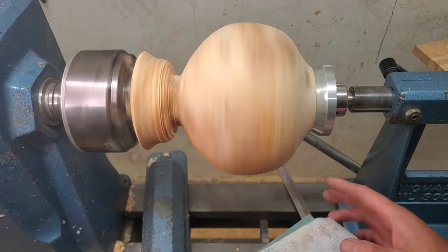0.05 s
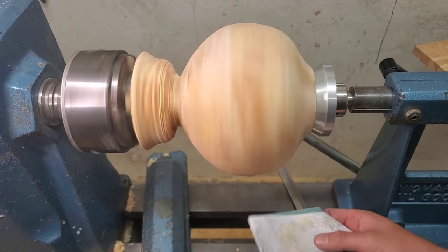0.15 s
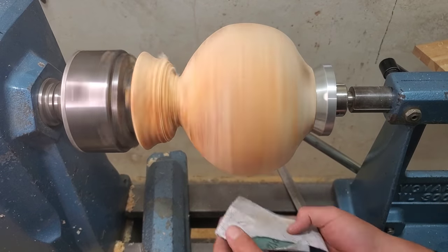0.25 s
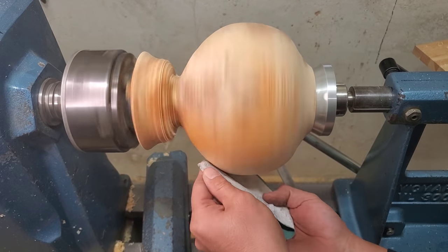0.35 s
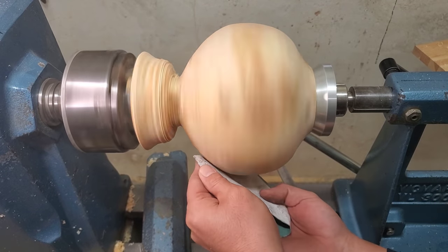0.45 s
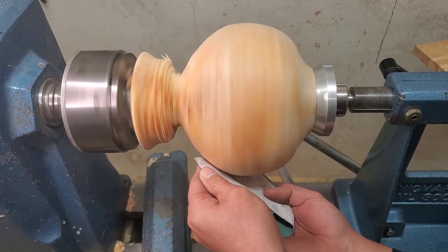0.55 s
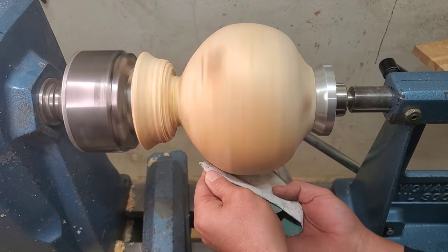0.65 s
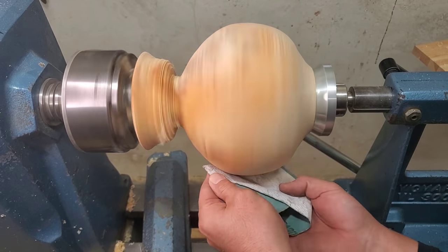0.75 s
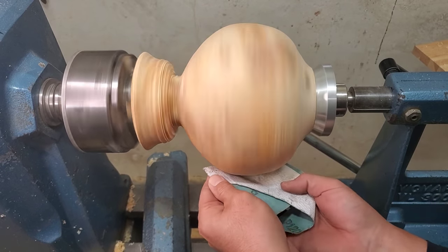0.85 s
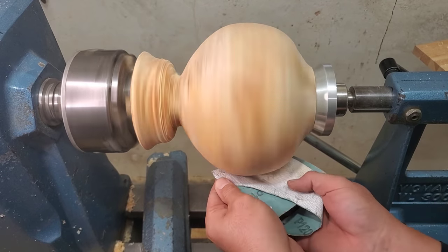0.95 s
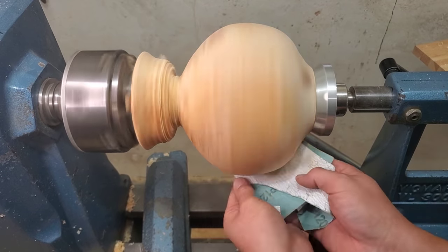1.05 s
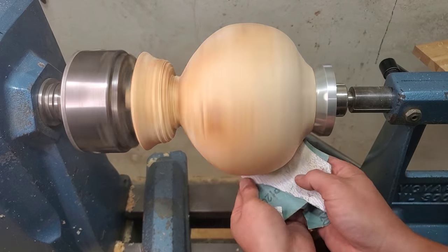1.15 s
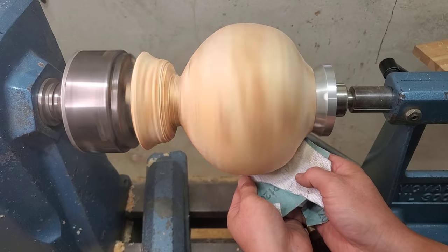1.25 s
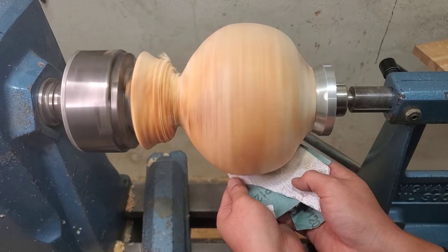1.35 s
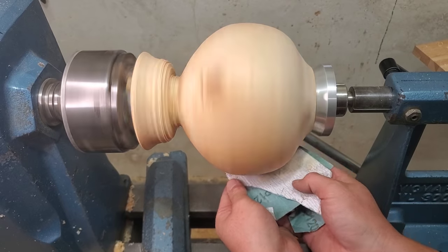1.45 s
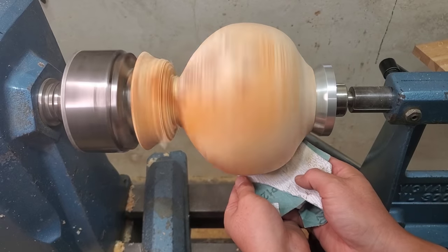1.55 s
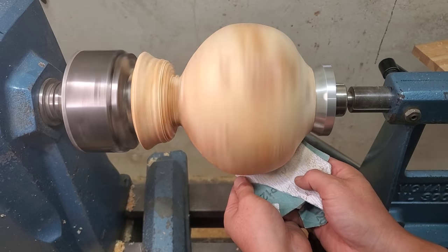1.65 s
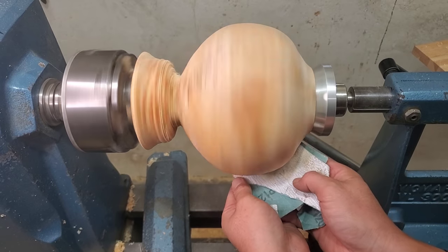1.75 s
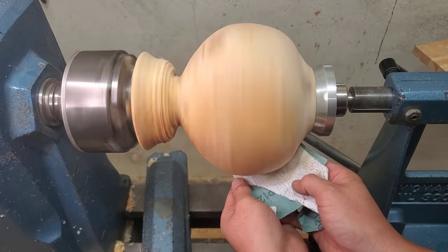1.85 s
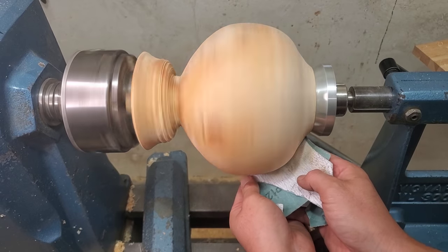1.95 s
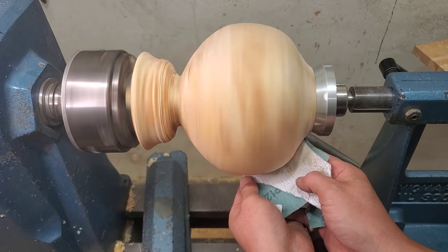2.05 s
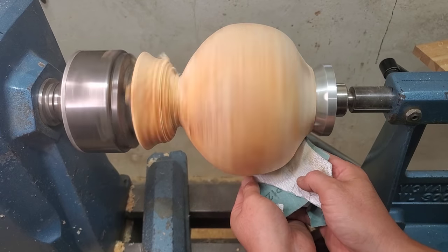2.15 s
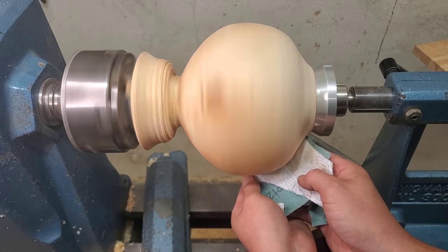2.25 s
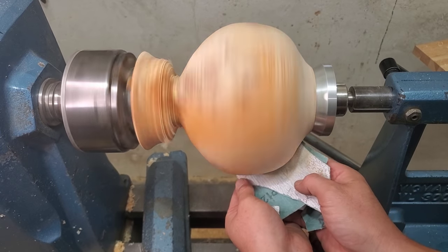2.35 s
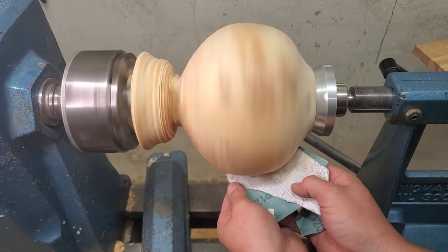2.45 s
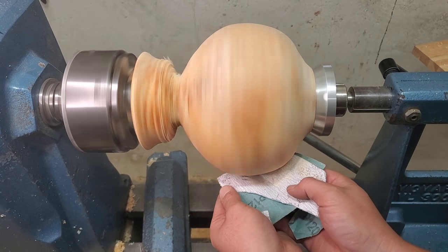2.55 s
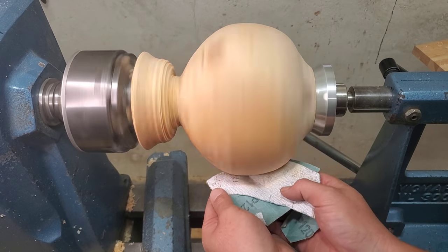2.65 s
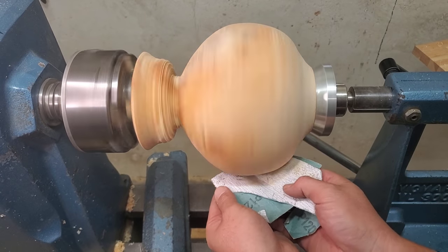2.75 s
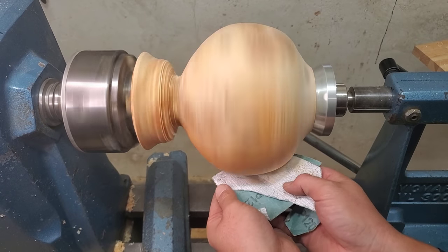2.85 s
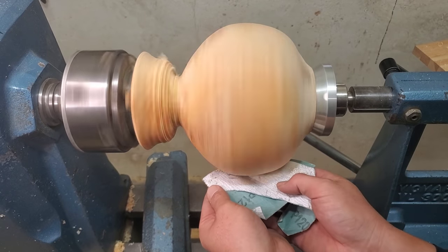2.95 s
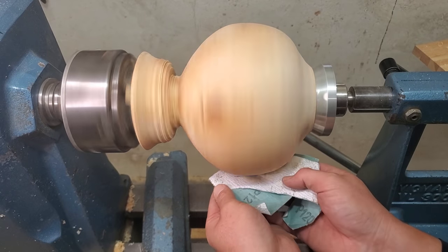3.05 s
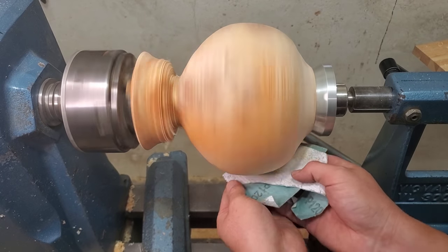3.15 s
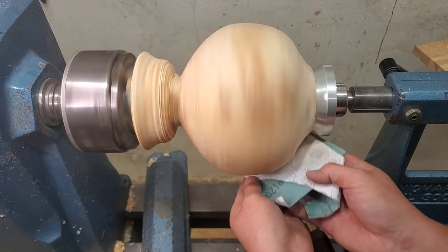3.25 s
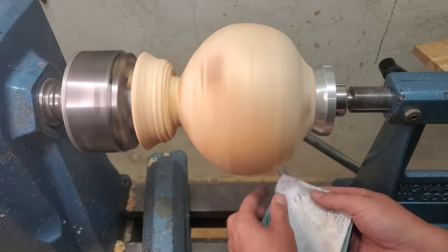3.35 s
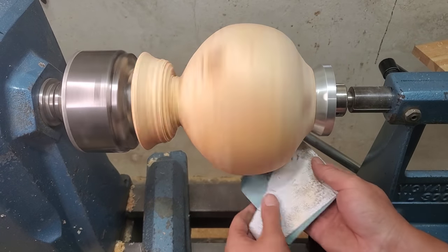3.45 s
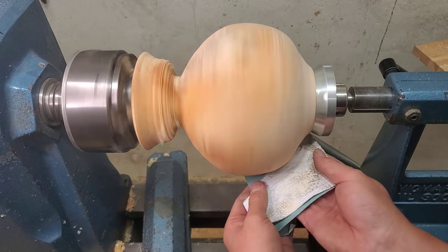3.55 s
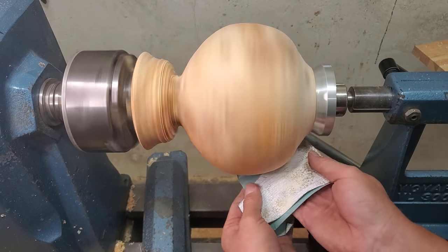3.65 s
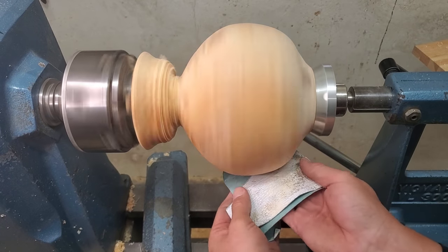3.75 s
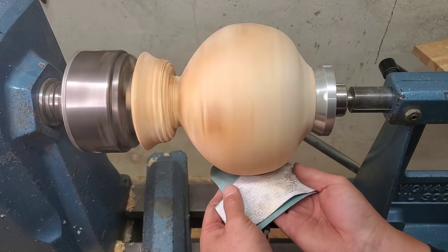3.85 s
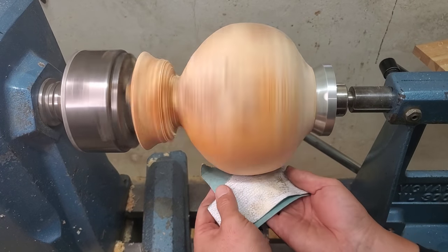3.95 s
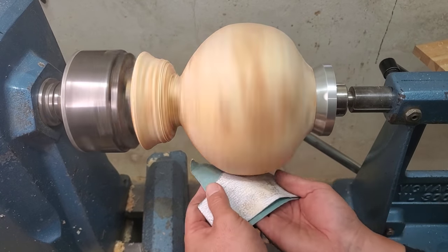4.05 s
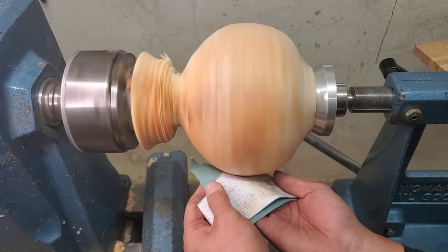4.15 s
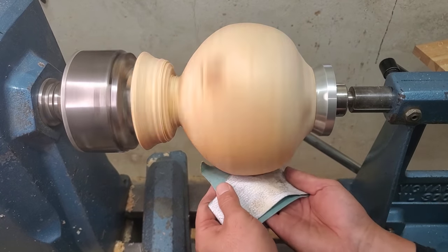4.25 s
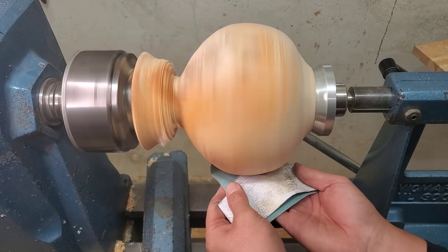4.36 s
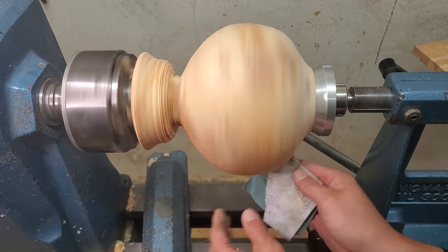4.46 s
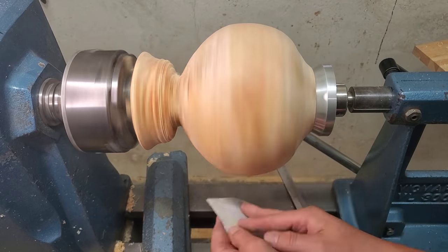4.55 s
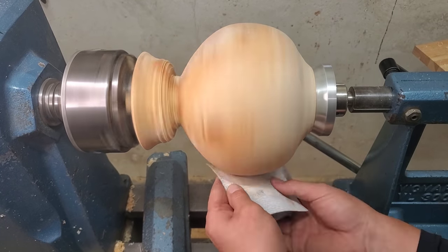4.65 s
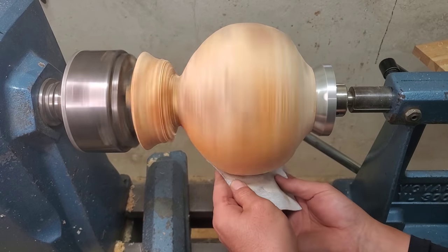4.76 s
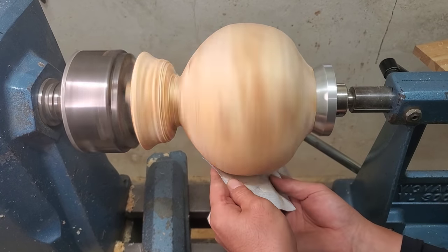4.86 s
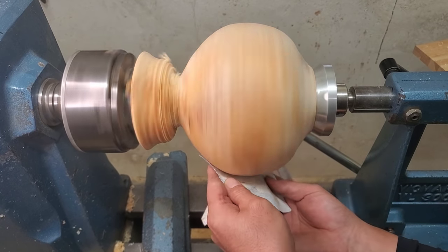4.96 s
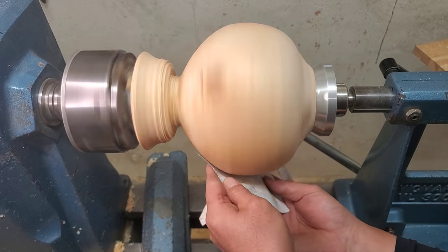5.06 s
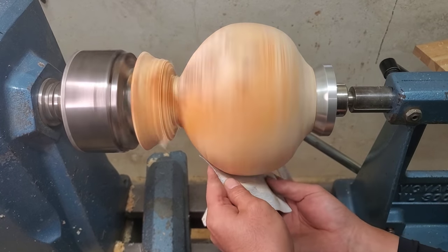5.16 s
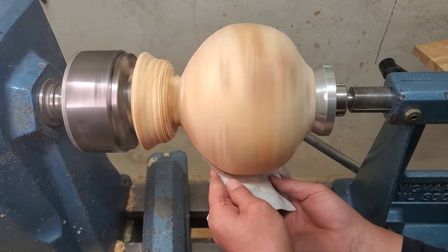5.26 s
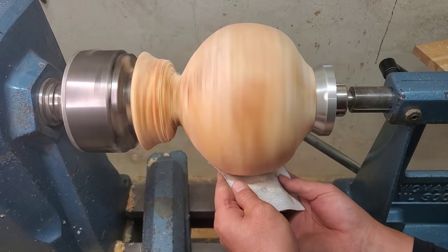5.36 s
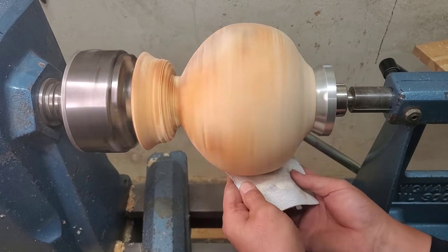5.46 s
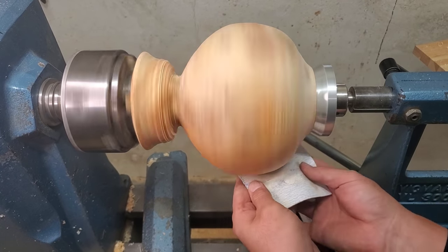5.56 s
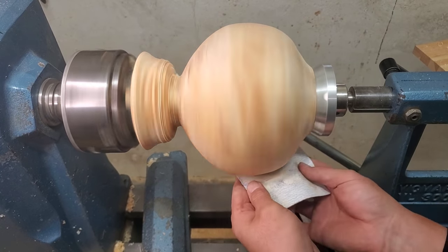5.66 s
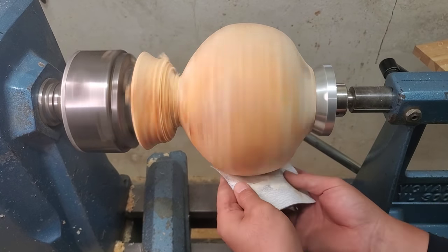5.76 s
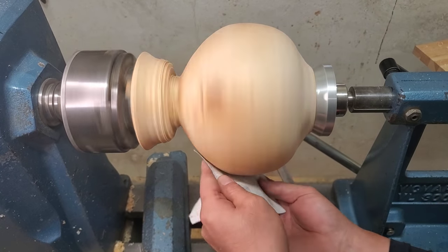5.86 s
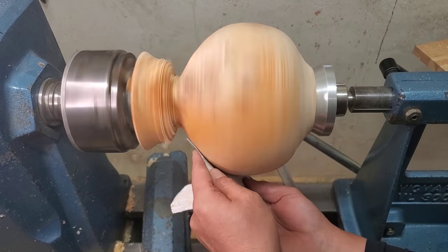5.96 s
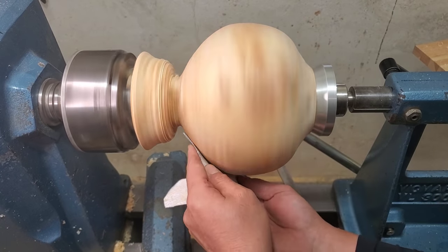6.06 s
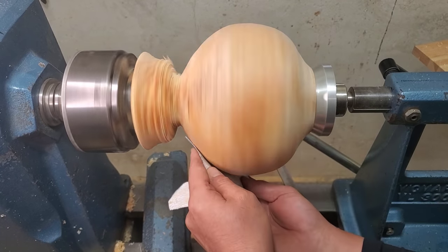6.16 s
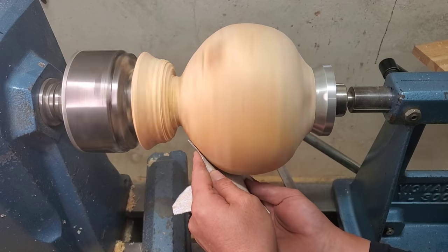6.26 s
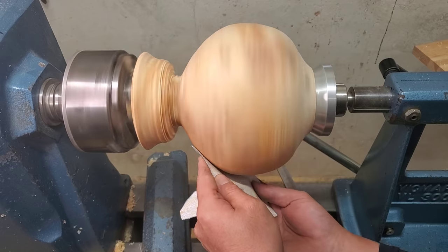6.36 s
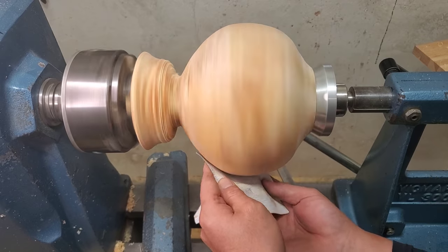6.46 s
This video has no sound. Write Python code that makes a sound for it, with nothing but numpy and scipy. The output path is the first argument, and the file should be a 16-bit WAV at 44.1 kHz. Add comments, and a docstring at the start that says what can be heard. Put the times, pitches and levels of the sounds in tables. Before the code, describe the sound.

A lathe hums low and quietly in a small workshop. After faint paper rustles, sandpaper lands on a spinning wooden ball with a loud, bright, grainy hiss that flutters rapidly with each turn. The hiss lasts about three seconds, lifts with short scuffs, returns for one second, stops briefly, then continues to the end. Close stereo microphone, very little echo.

```python
"""A folded sheet of sandpaper hisses against a wooden ball spinning on a lathe, in three long passes.
The hiss is broadband noise from the grit, throbbing as the ball's high spot and oval come round;
the sheet and the cupped hands filter it. Short scuffs are bursts of the same grainy noise.
Under it the lathe hums: resonant bearing and fan noise with wavering motor tones.
A small workshop adds reflections of the paper, and gain control ducks the whole when the paper is loud."""
import sys
import numpy as np
from scipy import signal
from scipy.fft import rfft, irfft
from scipy.io import wavfile
from scipy.ndimage import uniform_filter1d

SR = 44100
rng = np.random.default_rng(int(sys.argv[2]) if len(sys.argv) > 2 else 0)


def waveform_to_disk(signal):
    """Save audio, clipped to [-1, 1], as 16-bit WAV at the path in sys.argv[1]."""
    frames = np.transpose(np.atleast_2d(signal))
    scaled = np.clip(frames, -1, 1) * 32767
    samples = np.round(scaled).astype(np.int16)
    wavfile.write(sys.argv[1], SR, samples)


N = 287091
TIME = np.arange(N) / SR  # s

# Likeness of left and right for the lathe and the scuffs.
# Each row: frequency in Hz, correlation from 0 to 1.
LATHE_LIKENESS = [(40, 0.86), (130, 1), (390, 0.78), (700, 0.37), (1500, 0), (15000, 0)]


def gain_of(db):
    """The decibel law: 20 dB is a factor of ten in amplitude."""
    return 10 ** (np.asarray(db) / 20)


def evened(x):
    """Normalization of the mean power: scales to rms 1."""
    return x / np.sqrt(np.mean(x ** 2) + 1e-20)


def read(points, hz):
    """Interpolation of a spectrum along a logarithmic frequency axis."""
    f, value = np.transpose(points)
    return np.interp(np.log(hz + 1), np.log(f + 1), value)


def follow(rows, t):
    """Linear interpolation in time of every column after the first, at the times t."""
    s, *columns = np.transpose(rows)
    return [np.interp(t, s, c) for c in columns]


def humps(rows, hz):
    """Resonance curves: a sum of bells, in dB, each at half height half a width from its centre."""
    return sum(db / (1 + (2 * (hz - centre) / width) ** 2) for centre, width, db in rows)


def drift(rate_hz):
    """Low-passed noise: random wandering of rms 1, mostly slower than the rate."""
    hz = np.fft.rfftfreq(N, 1 / SR)
    slowed = rfft(rng.standard_normal(N)) / np.sqrt(1 + (hz / rate_hz) ** 4)
    return evened(irfft(slowed, N))


def pair(a, b, same, phase, side_db):
    """Partial coherence: two unrelated spectra become a partly alike left and right."""
    same = np.clip(same, -1, 1)
    left = (same * a + np.sqrt(1 - same ** 2) * b) * np.exp(1j * phase)
    return np.array([left * gain_of(side_db / 2), a * gain_of(-side_db / 2)])


def shifting(shape):
    """Slow random interference, rms 1: echoes between hands and ball change as the fingers move."""
    patches = uniform_filter1d(rng.standard_normal(shape), size=3, axis=-2)
    return evened(uniform_filter1d(patches, size=70, axis=-1))


def sanding(level_db=1.5, patchy_db=2.0, scatter=0.99, brighten=0.47):
    """Source and filter: abrasive noise is coloured by the sheet and by the hands that bend and cup it."""
    # Grit on wood. Each row: frequency in Hz, relative level in dB per Hz.
    grit_spectrum = [(150, -22.5), (500, -20.5), (900, -16.5), (1400, -8), (2000, -7), (2600, -6),
                     (3300, -7), (4200, -4.5), (5200, -3.5), (6700, 0.36), (8500, 0.75), (10500, 2),
                     (13000, 2.5), (15300, 3)]
    # Likeness at the two microphones. Each row: frequency in Hz, correlation from 0 to 1.
    hiss_likeness = [(300, .9), (800, .4), (1500, .5), (2800, .4), (3550, .78), (4400, .5), (5400, .58),
                     (7000, .3), (15000, .18)]
    # Phase between the microphones. Each row: frequency in Hz, lead of the left in radians.
    left_lead = [(500, 1.5), (1380, -2), (2000, -1), (2930, -1.26), (3550, -4), (5600, -3), (7500, -4),
                 (9400, -5), (15000, -9)]
    # Balance of the microphones. Each row: frequency in Hz, left minus right in dB.
    hiss_balance = [(700, 1), (1300, -2), (2400, -0.5), (4400, -2.5), (15000, -3)]
    # The paper slides along the ball. Each row: time in seconds, extra delay on the left in ms.
    slide = [(.5, -0.095), (1.2, 0.00047), (3.2, -0.025), (3.7, 0.011), (4.5, -0.051), (5.2, -0.054),
             (5.7, 0.011), (6.3, -0.11)]
    # Small peaks and dips by the fingers. Each row: centre in Hz, width in Hz, rms depth in dB.
    finger_ripple = [(4000, 4000, 1.2)]
    # Pressure of the hands. Each row: time in seconds, hiss level in dB, before level_db is added.
    hand_pressure = [(.5, -15.5), (.72, -18), (.86, -14), (1.06, -10.5), (1.46, -13.6), (1.54, -17.7),
                     (1.61, -14.5), (1.72, -13.5), (2.14, -14.5), (2.52, -16.5), (2.95, -17.5), (3.33, -16),
                     (3.65, -17), (3.88, -15.5), (4.16, -15), (4.29, -17), (4.4, -15.5), (4.53, -18.5),
                     (4.82, -15.5), (4.97, -12.5), (5.4, -16.5), (5.62, -15.5), (6.12, -15.5), (6.5, -20)]

    hz, t, z = signal.stft(grit(), SR, nperseg=512, noverlap=384)
    hz = hz[:, None]
    force_db = contact()

    colour = gain_of(read(grit_spectrum, hz) + held(hz, t))
    # the treble above 4 kHz is held at constant power
    colour /= np.sqrt(np.mean(colour[hz[:, 0] > 4000] ** 2, axis=0))
    # a harder bite is also a brighter one: the spectrum tilts about 9500 Hz
    frame_force_db = np.interp(t, TIME, uniform_filter1d(force_db, size=256))
    colour *= gain_of(brighten * frame_force_db * np.log2((hz + 1500) / 11000))

    # each microphone hears the paper by its own shifting paths
    delay = follow(slide, t)[0] / 1000  # s
    phase = read(left_lead, hz) - 2 * np.pi * hz * delay + scatter * shifting(colour.shape)
    colour = colour * gain_of(humps(finger_ripple, hz) * shifting(colour.shape))
    patches = gain_of(patchy_db * shifting(z.shape))
    stereo = pair(*z, read(hiss_likeness, hz), phase, read(hiss_balance, hz))
    coloured = colour * patches * stereo

    hiss = evened(signal.istft(coloured, SR, nperseg=512, noverlap=384)[1][:, :N])
    return hiss * touch() * gain_of(force_db + follow(hand_pressure, TIME)[0] + level_db)


def grit(snags_per_s=1500, spread_db=2.0, snag_db=-10):
    """Shot noise over Gaussian noise: countless grains cut while larger ones snag; two unrelated views."""
    sizes = gain_of(spread_db * np.minimum(rng.exponential(1, N), 5))
    snags = sizes * (rng.random(N) < snags_per_s / SR) * rng.choice([-1, 1], (2, N))
    return evened(rng.standard_normal((2, N)) + gain_of(snag_db) * evened(snags))


def contact(spindle_hz=22.58, figure_db=0.14, figure_share=0.27, flutter_db=0.62, chatter_db=0.23):
    """Amplitude modulation by rotation: force on the grit in dB, with random flutter and chatter."""
    # The ball runs off centre and oval. Each row: time in seconds, throb on the high spot in dB,
    # where round the ball the paper meets it in turns, throb on the oval in dB.
    throb = [(.5, .9, -.55, 1.5), (.68, 0.8, -.28, 0), (.82, 0.2, -0.8, 1.5), (1.02, 1.7, -.78, 1.2),
             (1.25, 1.2, -.83, 1.3), (1.56, 3, -.74, 0.5), (1.8, 1.3, -0.71, 1), (2.35, 1.6, -0.66, .5),
             (2.8, 0.5, -0.77, 1.6), (3.17, 1.9, -.81, 0.5), (3.33, 1.1, -.8, -1), (3.63, 2.2, -.48, -0.5),
             (3.92, 1.7, -0.23, 1.5), (4.04, 0.8, -.6, 0), (4.17, 2.9, -.83, 1.3), (4.3, 2.5, -0.68, 1.4),
             (4.5, 1, -0.82, 1.5), (4.85, 1, -0.083, -0.2), (5.3, 0.6, -0.17, -1), (5.68, 1.1, -.06, 0),
             (5.87, 1.4, 0.09, 1.5), (6.08, 0.9, -.05, 0.5), (6.4, 1, .16, -0.5)]
    # Where the paper meets the oval's ridge. Each row: time in seconds, place round the ball in turns.
    ridge = [(1.1, -0.14), (1.5, -.17), (2.9, -.12), (3.25, 0.072), (3.75, -0.43), (4.5, -0.29),
             (5.6, -.41)]
    high_db, high_turns, oval_db = follow(throb, TIME)
    turn = 2 * np.pi * spindle_hz * TIME  # radians
    once = high_db * np.cos(turn - 2 * np.pi * high_turns)
    twice = oval_db * np.cos(2 * (turn - 2 * np.pi * follow(ridge, TIME)[0]))
    # hard and soft grain pass in the same order on every turn; their depth follows the oval's throb
    harmonics = (np.cos(k * turn + 2 * np.pi * rng.random()) / np.sqrt(k) for k in range(3, 10))
    figure = (figure_db + figure_share * oval_db) * evened(sum(harmonics))
    return once + twice + figure + flutter_db * drift(25) + chatter_db * drift(600)


def held(hz, t, rasp_top_hz=4950):
    """Resonant filtering, in dB: grip bands, gliding air-pocket bands, a steep-edged rasp, sheet modes."""
    # Lowest resonances of the stiff sheet. Each row: centre in Hz, width in Hz,
    # level in dB where the sheet's ringing factor is 1.
    sheet_modes = [(1400, 300, 1.5), (2010, 170, 5.5), (2550, 450, -2.5)]
    # Body, then fizz. Each row: centre in Hz, width in Hz.
    grip_bands = [(1750, 1400), (14000, 5000)]
    # Relative levels as the grip changes. Each row: time in seconds, body in dB, rasp in dB,
    # lower edge of the rasp in Hz, hollow in dB, fizz in dB.
    grip_colour = [(0.5, -5.7, 4.5, 2700, -1, 1.5), (0.75, -4, 6.5, 2900, 2, -1.5),
                   (1.08, -5.5, 7.5, 2150, 1.5, 2.5), (1.32, 3, 11, 2300, 10, 4.5),
                   (1.55, -4, 4, 2170, 2, 3.5), (1.7, 0, 8, 2050, 5, 2.5), (2.02, 2, 8.5, 2060, 4.5, 3),
                   (2.3, 3, 6, 2380, 10, 4.5), (2.58, 2.5, 11.5, 2400, 3, 1.5), (2.97, 0, 11, 2350, 3, 2),
                   (3.15, -1, 7, 2530, 2.5, 1), (3.35, -6, 5.5, 2300, -0.5, -3.5),
                   (3.65, -4, 10.5, 2400, 7, 2), (3.95, -5.5, 4.5, 2280, 1, -4),
                   (4.2, -6.5, 5, 2200, -0.5, -0.5), (4.5, -3.4, 6, 2390, 1, 0.5),
                   (4.87, -2, 1.7, 3040, 1, -1), (5.2, 1, 6, 3150, 0, -1.5), (5.5, 2.5, 6, 2400, 2, -0.5),
                   (5.75, -4.5, 7.3, 2300, 1, 2), (6.05, 3, 6.5, 2600, 2, -0.5),
                   (6.5, 1, 5, 2750, -1, -4.3)]
    # The air under the hands changes shape. Each row: time in seconds, resonance in Hz,
    # its level in dB, notch in Hz, its level in dB, centre of the hollow band in Hz.
    air_pocket = [(.7, 4700, 2, 5500, 1.5, 6500), (1.25, 3780, 3, 5000, -0.5, 5750),
                  (1.7, 4630, 0.5, 5240, -3, 5800), (2.35, 4670, 3, 5250, -1, 5740),
                  (2.75, 3550, 4.5, 4900, -4.5, 6070), (3.25, 3900, 3, 5350, -6, 6400),
                  (3.7, 3750, 1, 5050, -3, 6550), (4.4, 4100, 3.5, 4850, 0, 6500),
                  (4.88, 3840, 2, 4580, -1, 6600), (5.55, 4280, 4, 5500, -4, 6500),
                  (6.15, 3930, 1, 4630, -1, 6000)]
    body_db, rasp_db, edge_hz, hollow_db, fizz_db = follow(grip_colour, t)
    peak_hz, peak_db, notch_hz, notch_db, hollow_hz = follow(air_pocket, t)
    bands = [(centre, width, db) for (centre, width), db in zip(grip_bands, (body_db, fizz_db))]
    # centre in Hz, width in Hz, level in dB
    pocket = [(peak_hz, 280, peak_db), (notch_hz, 290, notch_db), (hollow_hz, 1600, hollow_db)]
    rasp = 1 / (1 + (edge_hz / hz) ** 12) / (1 + (hz / rasp_top_hz) ** 8)
    ring = current_pass(t)[-1] * humps(sheet_modes, hz)
    return humps(bands + pocket, hz) + rasp_db * rasp + ring


def touch():
    """Contact envelope, 0-1: amplitude grows as a square on landing and decays exponentially on lifting."""
    lands, lifts, landing, lift_db_per_s, _ = current_pass(TIME)
    landed = np.clip((TIME - lands) / landing, 0, 1) ** 2
    return landed * gain_of(-lift_db_per_s * np.maximum(TIME - lifts, 0))


def current_pass(t):
    """Piecewise-constant states: every column of the latest pass begun at the times t."""
    # The paper is laid on the ball. Each row: landing in seconds, lifting in seconds,
    # landing time in seconds, fade on lifting in dB per second, factor on the sheet's ringing.
    passes = [(0.422, 3.402, 0.069, 371, 0.7), (3.595, 4.535, 0.027, 258, 0.1),
              (4.752, 6.6, 0.057, 258, 1.15)]
    rows = np.array(passes)
    return rows[np.maximum(np.searchsorted(rows[:, 0], t) - 1, 0)].T


def scuffs(ragged_db=2.5):
    """Transient friction: band-limited grainy rubs of the sheet, quick to rise and slower to fade."""
    # The paper is handled, bumps or catches. Each row: start in seconds, level in dB,
    # length in seconds, centre in Hz, width (standard deviation) in octaves.
    rubs = [(0.0, -52, 0.74, 48, 0.55), (0.079, -41, 0.038, 8000, 1.3), (0.245, -47, 0.093, 8000, 1.2),
            (0.248, -40.5, 0.21, 172, 0.39), (0.417, -39, 0.012, 8000, 1.2),
            (0.432, -47.5, 0.057, 55, 0.54), (1.206, -33, 0.13, 600, 1.04), (1.232, -31, 0.031, 240, 0.68),
            (3.339, -16.5, 0.028, 8900, 0.92), (3.415, -22.5, 0.025, 7000, 1.5),
            (3.426, -35.5, 0.07, 6000, 1.6), (3.574, -37, 0.016, 8000, 1.3), (3.58, -32, 0.055, 7750, 1.8),
            (3.607, -18, 0.019, 7000, 1.4), (3.74, -14, 0.018, 9000, 1.3), (4.578, -22, 0.043, 10100, 1.7),
            (4.6, -23, 0.034, 9000, 1.6), (4.61, -36, 0.085, 7000, 2), (4.685, -44.5, 0.07, 7000, 1.4),
            (4.756, -33, 0.039, 8000, 1.4)]
    hz = np.fft.rfftfreq(N, 1 / SR)
    out = np.zeros((2, N))
    for s, db, length, centre, octaves in rubs:
        z = pair(*rfft(grit(snags_per_s=1400, snag_db=-6)), read(LATHE_LIKENESS, hz), 0, -2)
        band = np.exp(-.5 * (np.log2((hz + 1) / centre) / octaves) ** 2)
        rub = evened(irfft(z * band, N))
        age = np.clip((TIME - s) / length, 0, 1)
        out += gain_of(db) * rub * np.sin(np.pi * age ** 0.65)
    return out * evened(gain_of(ragged_db * drift(120)))


def lathe(whirr_db=2.0, side_db=-1.5, tone_flicker=0.17):
    """Forced resonance: bearing and fan noise rings the headstock; motor tones waver with the belt."""
    # Bearings, belt and cooling fan. Each row: frequency in Hz, relative level in dB per Hz.
    whirr_spectrum = [(25, -22), (55, -17.5), (85, -15.5), (120, -9.5), (200, -12), (280, -9), (350, -13),
                      (480, -14.5), (750, -10.5), (1400, -12), (2600, -16), (5000, -24), (9000, -29.5),
                      (15500, -31.5)]
    # Resonances of headstock and drive. Each row: centre in Hz, width in Hz, level in dB.
    headstock_modes = [(129, 48, 2), (166.4, 37, 10.5), (232.7, 27.5, 8.5), (384, 4.2, 10), (554, 9.4, 8),
                       (15370, 150, 17)]
    # Motor tones. Each row: frequency in Hz, level in dB relative to the lathe's running level,
    # rms waver in Hz, start in seconds.
    motor_tones = [(129, -9, 4.41, -.1), (389.3, -7, 7.8, 0.12)]
    # Running level, before whirr_db and the tone levels. Each row: time in seconds, level in dB.
    running_level = [(.05, -39.6), (.3, -39)]
    hz = np.fft.rfftfreq(N, 1 / SR)
    z = pair(*rfft(rng.standard_normal((2, N))), read(LATHE_LIKENESS, hz), 0, side_db)
    colour = gain_of(read(whirr_spectrum, hz) + humps(headstock_modes, hz))
    out = gain_of(whirr_db) * evened(irfft(z * colour, N))
    for tone_hz, db, waver_hz, start in motor_tones:
        phase = 2 * np.pi * np.cumsum(tone_hz + waver_hz * drift(21.5)) / SR
        tone = np.sqrt(2) * np.sin(phase)  # rms 1
        swell = np.clip((TIME - start) / 0.034, 0, 1) * (1 + tone_flicker * drift(37))
        out = out + gain_of([[db + side_db / 2], [db - side_db / 2]]) * swell * tone
    return out * gain_of(follow(running_level, TIME)[0])


def workshop(x, t60=0.069):
    """Reverberation: dense, exponentially decaying reflections from floor, bench and walls."""
    t = np.arange(SR // 2) / SR
    # 2000 reflections a second, none in the first 4 ms
    taps = rng.choice([-1, 1], (2, len(t))) * (rng.random((2, len(t))) < 2000 / SR) * (t > .004)
    tail = taps * gain_of(-60 * t / t60)
    return signal.fftconvolve(x, tail / np.linalg.norm(tail, axis=1, keepdims=True), axes=1)[:, :N]


def scene(room_db=-16):
    """Superposition: paper and lathe close by, with a little room on the paper."""
    paper = sanding() + scuffs()
    return paper + gain_of(room_db) * workshop(paper) + lathe()


def record(dry):
    """Dynamic compression: loud moments turn everything down, with slow recovery; then the band limit."""
    threshold_db, recover_db_per_s = -23.5, 4
    share = 0.64  # part of the excess taken off
    edge_hz = 15520
    power_db = 10 * np.log10(abs(uniform_filter1d((dry ** 2).mean(0), size=900)) + 1e-12)
    # a running maximum on a rising ramp: instant attack, linear recovery in dB
    recovery = recover_db_per_s * TIME
    held_db = np.maximum.accumulate(power_db + recovery) - recovery
    over_db = np.maximum(held_db - threshold_db, 0)
    ducked = dry * gain_of(-share * uniform_filter1d(over_db, size=400))
    low_pass = signal.firwin(801, edge_hz, window=("kaiser", 8), fs=SR)
    return signal.oaconvolve(ducked, low_pass[None], "same")


dry = scene()
out = record(dry)
waveform_to_disk(out)
```